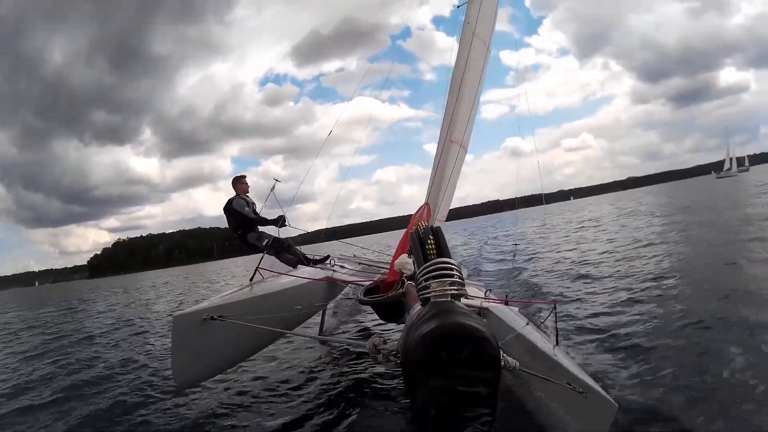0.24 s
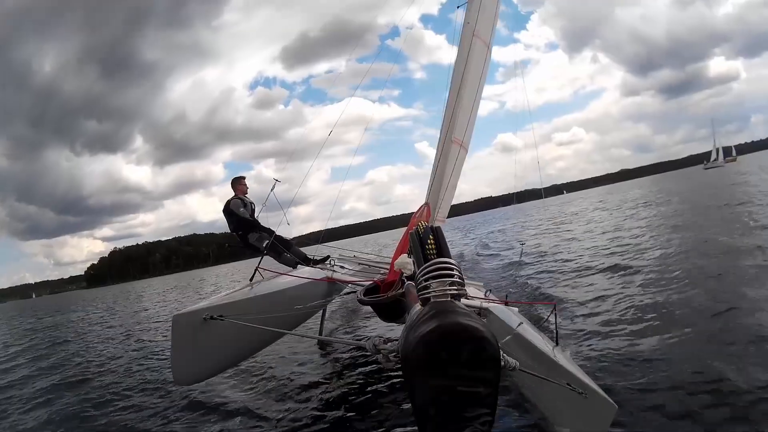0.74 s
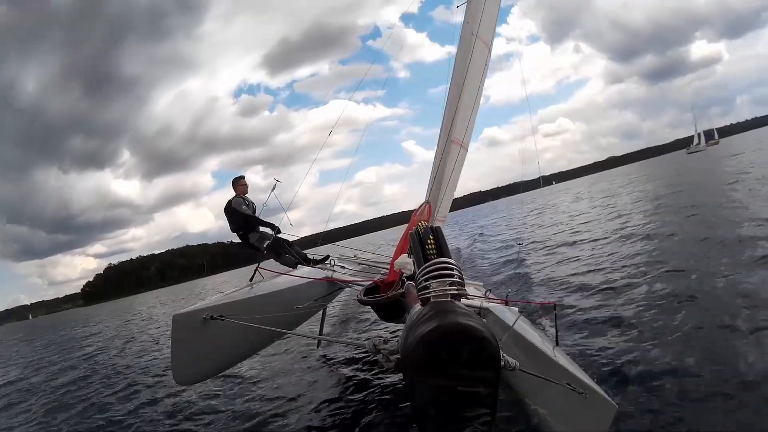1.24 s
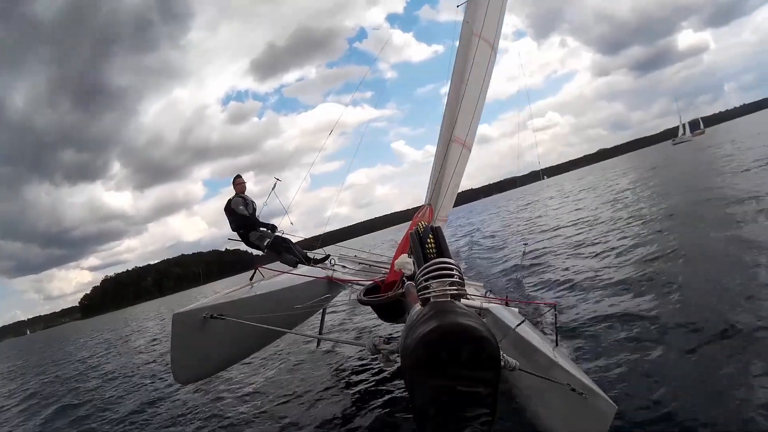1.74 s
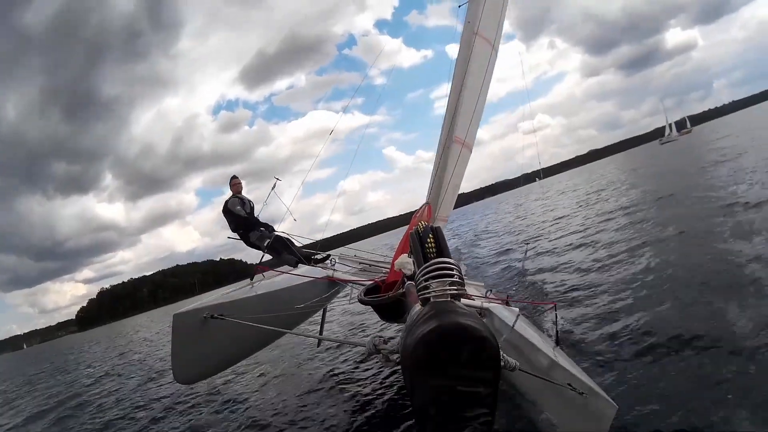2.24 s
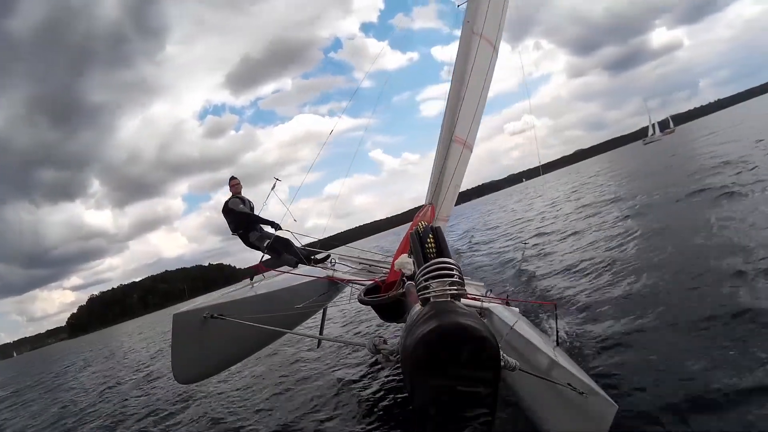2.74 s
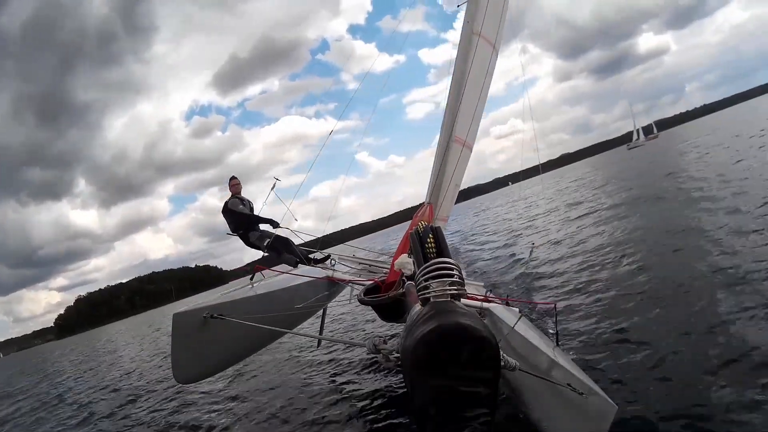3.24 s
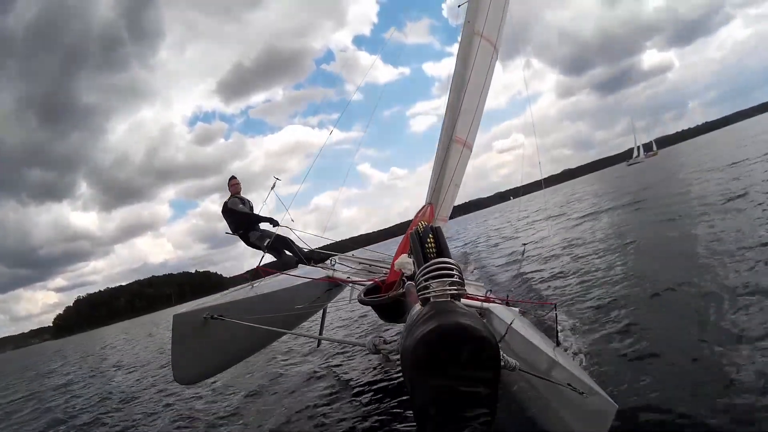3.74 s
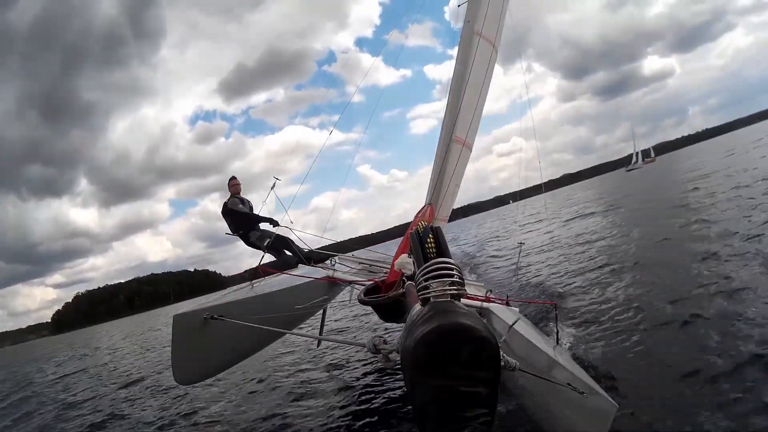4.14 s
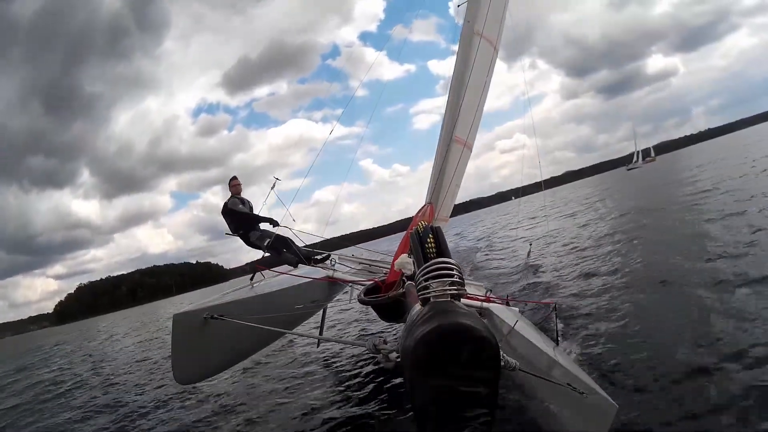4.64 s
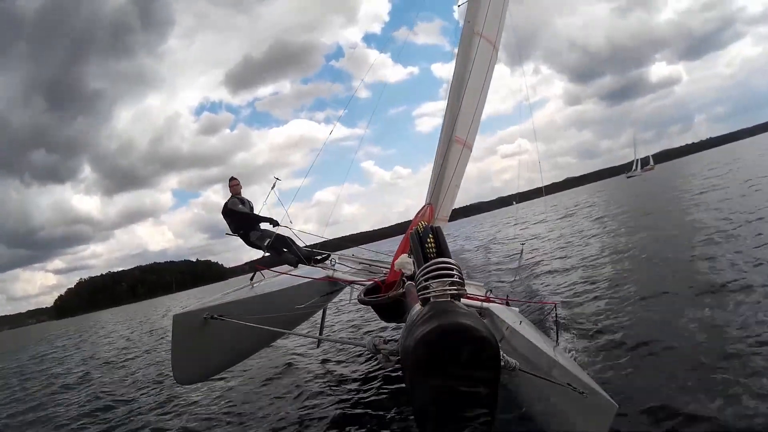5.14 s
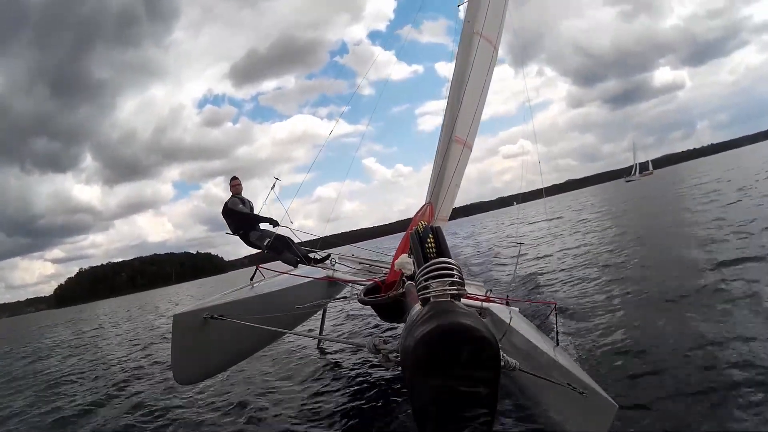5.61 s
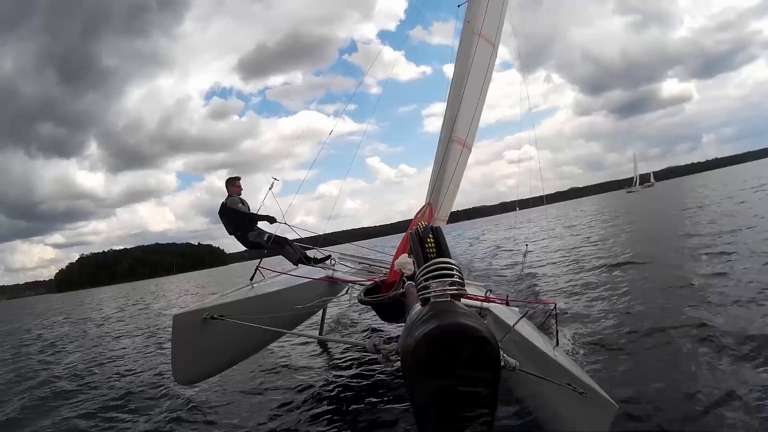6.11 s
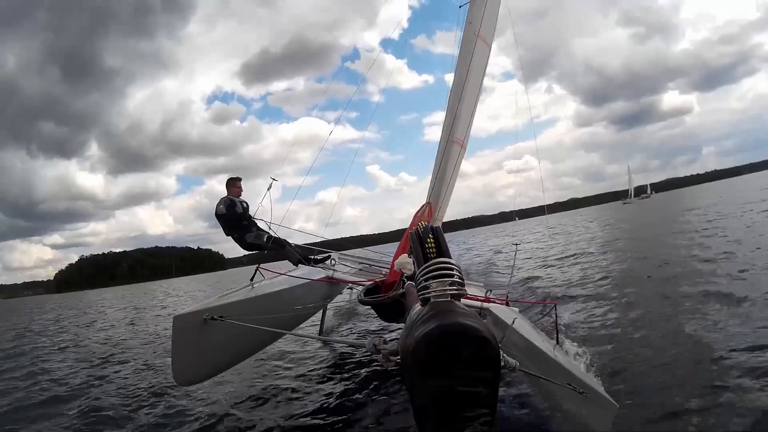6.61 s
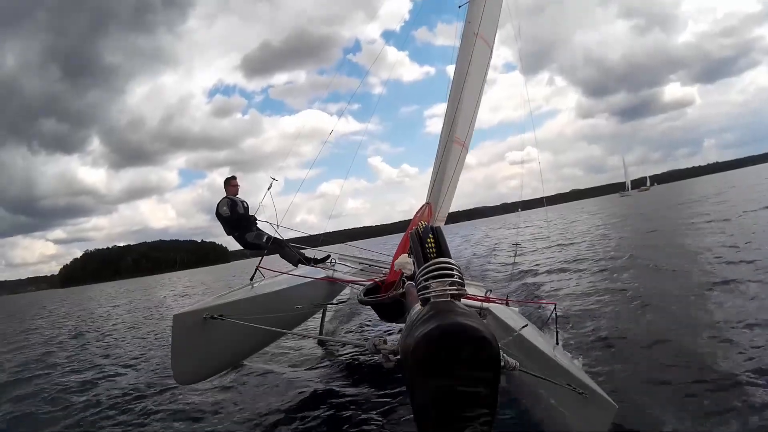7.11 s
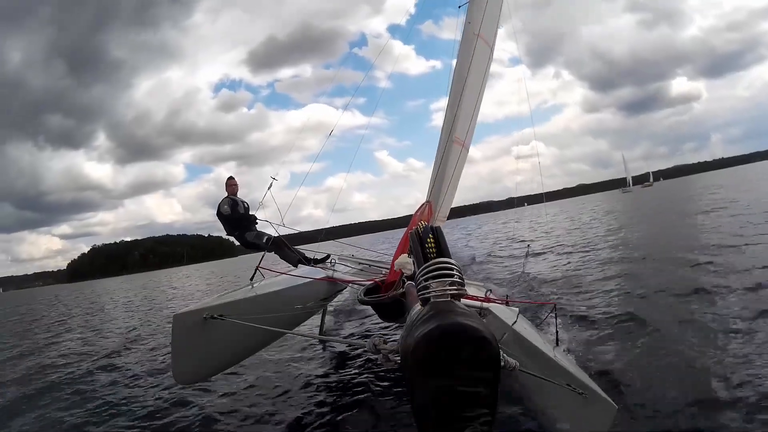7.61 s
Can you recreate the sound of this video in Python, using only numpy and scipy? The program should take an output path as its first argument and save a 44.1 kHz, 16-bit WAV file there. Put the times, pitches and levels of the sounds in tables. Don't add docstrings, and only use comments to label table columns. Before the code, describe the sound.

On open water, a sailing catamaran moves along with steady muffled wash and small waves lapping its hulls. The sheet block clicks, waves knock and rattle the hull, and the pole throbs deep below. Activity is busiest in the first two seconds, quiet in the middle, and rises again briefly after six. The close, boxy contact-like pickup has little treble and a silent right channel.

```python
import sys
import numpy as np
from scipy import signal
from scipy.fft import rfft, irfft
from scipy.io import wavfile
from scipy.ndimage import uniform_filter1d

SR = 44100
rng = np.random.default_rng(int(sys.argv[2]) if len(sys.argv) > 2 else 0)


def linear_from_db(decibels):
    return 10 ** (np.asarray(decibels, float) / 20)


def persist_wave(psi):
    counts = np.round(np.clip(psi, -1, 1) * 32767).astype(np.int16)
    wavfile.write(sys.argv[1], SR, np.atleast_2d(counts).T)


N = 346626

# mode_hz, t60_s, wash_db, knock_db
BOOM = [(107.8, 0.14, -11, -12.5), (182.5, 0.055, -23.5, -13), (232, 0.047, -9, -26), (279, 0.054, -14, -9),
        (358, 0.11, 0.5, -3.5), (385, 0.13, -2.5, -6), (444.7, 0.034, -10, -5)]
BODY = [(559.8, 0.036, 0, -3), (609, 0.015, -7.5, -4.5), (717.5, 0.079, -3.5, 0), (826, 0.024, -11, -1)]
# mode_hz, t60_s, wash_db, knock_db, ratchet_db
BUZZ = [(870, 0.026, -10.5, -6.5, -9), (1025, 0.044, -1, -1.5, -1.5), (1101, 0.019, -2.5, -3.5, -1.5),
        (1258, 0.033, -4.5, 2, 1), (1402, 0.032, 5, 1.5, -5), (1446, 0.025, -3.5, 4, 5.5),
        (1610, 0.022, -26, -16, -10), (1692, 0.016, -6.5, -9.5, -3.5)]
TICK = [(2129, 0.025, 8.5, 9.5, -19), (2328, 0.03, 4.5, 6, 3), (2590, 0.042, -7, -12, -13),
        (3063, 0.023, -1.5, -1, -2.5), (3240, 0.008, -11, -27, 3), (3510, 0.015, -17, -8, -2.5),
        (3550, 0.017, -14, -8, -20), (3950, 0.023, -4, -2.5, -16), (4590, 0.012, -20, -19, -12)]
WINDOW_HZ = 3830
STRUCTURE_GAIN_DB = 6.5


def level(x, rms_db):
    return x * linear_from_db(rms_db) / np.sqrt(np.mean(x ** 2))


def walk(rate_hz):
    hold = int(SR / rate_hz)
    steps = np.repeat(rng.standard_normal(N // hold + 1), hold)
    return 1.45 * uniform_filter1d(uniform_filter1d(steps, hold), hold)[:N]


def curve(table):
    time_s, *columns = np.transpose(table)
    return [np.interp(np.arange(N) / SR, time_s, column) for column in columns]


def ring(push, mode_hz, t60_s):
    r = np.exp(-np.log(1000) / (t60_s * SR))
    poles = [1, -2 * r * np.cos(2 * np.pi * mode_hz / SR), r * r]
    return np.sqrt(1 - r * r) * signal.lfilter([1, 0, -1], poles, push)


def case(x, cutoff_hz=1705):
    return signal.sosfilt(signal.cheby1(6, 1, cutoff_hz, fs=SR, output="sos"), x)


def wash(modes, push, flicker_db):
    total = np.zeros(N)
    for mode_hz, t60_s, wash_db, *_ in modes:
        mode = ring(push * rng.standard_normal(N), mode_hz, t60_s)
        total += linear_from_db(wash_db + flicker_db * walk(14)) * mode
    return level(total, 0)


def laps():
    lap_table = [(0.032, 6, .05), (0.875, 2, .06), (1.29, 2.5, .03), (2.04, 5, 0.059), (2.41, 3.5, 0.047),
                 (2.848, 0.5, .04), (2.959, 7, 0.064), (3.467, 5.5, .03), (3.6, 3, 0.066),
                 (3.995, 3.5, 0.038), (4.3, 4, .04), (4.538, 3.5, 0.076), (5.092, 3, 0.045),
                 (5.49, 3, 0.083), (5.719, 1.5, 0.09), (6.316, 6, 0.048), (6.52, 3, 0.033),
                 (6.93, 3.5, 0.089), (7.206, 1, .05), (7.634, 1, 0.026)]
    crest_s, lift_db, half_s = np.transpose(lap_table)[:, :, None]
    t = np.arange(0, N + 64, 64) / SR
    humps_db = lift_db * np.exp(-((t - crest_s) / half_s) ** 2)
    return np.sum(humps_db, axis=0).repeat(64)[:N]


def water():
    # time_s, flow_db, froth_db (shifts the weight from boom to buzz)
    flow = [(0.0, -53, -0.5), (0.61, -53, 0), (1.22, -52, 1.5), (1.47, -48.5, 2.5), (1.55, -50.5, -3.5),
            (1.86, -52.5, 2), (2.47, -55.5, 0), (2.8, -53.5, 1), (3.26, -56.5, 0.5), (3.57, -54.5, -1.5),
            (4.49, -54, -0.5), (4.84, -56, 1), (6.22, -54, 0.5), (6.41, -47.5, -6.5), (6.61, -51.5, 1.5),
            (7.03, -50, 0), (7.51, -55, 2), (7.86, -54.5, -1.5)]
    flow_db, froth_db = curve(flow)
    flow_db = flow_db + laps() + 6
    boom_db = flow_db - 1 - 0.5 * froth_db
    body_db = flow_db - 4 + 0.1 * froth_db
    buzz_db = flow_db - 6.5 + 0.5 * froth_db
    spray_db = buzz_db - 22
    puffs_db = 1.01 * walk(22) + 2.02 * walk(70)
    low = linear_from_db(boom_db) * wash(BOOM, linear_from_db(0.44 * puffs_db), flicker_db=1.5)
    low += linear_from_db(body_db) * wash(BODY, linear_from_db(1.04 * puffs_db), flicker_db=2.5)
    low += linear_from_db(buzz_db) * wash(BUZZ, linear_from_db(0.74 * puffs_db), flicker_db=1.5)
    spray = linear_from_db(spray_db) * wash(TICK, linear_from_db(0.8 * puffs_db), flicker_db=1.5)
    return case(low) + spray


def hiss():
    # freq_hz, level_db
    colour = [(100, 7), (2000, 6), (4000, 0.5), (8000, -1), (16000, -3)]
    freq_hz, colour_db = np.transpose(colour)
    bin_hz = np.arange(N // 2 + 1) * SR / N
    gain_db = np.interp(np.log(bin_hz + 1), np.log(freq_hz), colour_db)
    return level(irfft(rfft(rng.standard_normal(N)) * linear_from_db(gain_db), N), -67.5)


def jolts():
    jolt_table = [(0.01, -45, 0.041), (0.24, -57.5, 0.38), (0.61, -54, 0.087), (0.88, -53, 0.22),
                  (1.01, -50.5, 0.19), (1.38, -39, 0.053), (1.53, -42, .08), (1.6, -42, 0.039),
                  (1.71, -41.5, 0.096), (1.95, -52, 0.35), (2.2, -59, .06), (2.32, -58, 0.062),
                  (2.56, -54.5, 0.074), (3.06, -52.5, 0.092), (3.37, -53, 0.069), (3.59, -61, .2),
                  (3.74, -50.5, 0.087), (4.07, -65, 0.093), (4.29, -57, .2), (4.53, -57, .15),
                  (4.88, -55, 0.27), (5.71, -55, 0.039), (5.82, -54.5, .2), (6.17, -52.5, .04),
                  (6.3, -44.5, 0.11), (6.52, -51.5, 0.049), (6.92, -49, 0.13), (7.29, -53, 0.046),
                  (7.45, -56, 0.21), (7.84, -51, .03)]
    idle_db, flicker_db, rise_s = -61, -1, 0.045
    t = np.arange(N) / SR
    power = linear_from_db(idle_db + flicker_db * walk(6)) ** 2
    for start_s, level_db, ring_s in jolt_table:
        age = t - start_s
        shape = np.where(age < 0, -(age / rise_s) ** 2, -age / ring_s)
        power = power + (linear_from_db(level_db) * np.exp(shape)) ** 2
    return 10 * np.log10(power)


def pole():
    # time_s, pitch_hz
    stays = [(0, 59.3), (.45, 55.55), (.65, 49.2), (1.38, 51.2), (1.58, 61.8), (1.78, 57.05), (2.3, 62.96),
             (2.6, 47), (2.93, 56.4), (3.1, 46.45), (3.42, 55.36), (3.7, 44.3), (4.15, 60.1), (4.75, 58.25),
             (4.98, 44), (6.4, 53), (7.1, 56.94), (7.75, 45)]
    # mode_hz, t60_s, wash_db, unused
    hum = [(41, 0.29, 0, 0), (73.1, 0.36, -2, 0), (109.5, 0.03, -12, 0), (154, 0.12, -9, 0)]
    (pitch_hz,), swing_db = curve(stays), jolts()
    upright_hz = pitch_hz * (1 + 0.0811 * walk(18))
    sideways_hz = 1.1 * pitch_hz * (1 + 0.1057 * walk(20))
    swing = np.sin(2 * np.pi * np.cumsum(upright_hz) / SR)
    swing += 0.46 * np.sin(2 * np.pi * np.cumsum(sideways_hz) / SR)
    rumble_db = uniform_filter1d(swing_db, SR // 5) - 3.5
    rumble = linear_from_db(rumble_db) * wash(hum, 1.0, flicker_db=2.5)
    return linear_from_db(STRUCTURE_GAIN_DB) * (linear_from_db(swing_db + 1.5) * swing + rumble)


def blows(table, share_column, rise_s):
    size = SR // 8
    t, out = np.arange(size) / SR, np.zeros(N + size)
    for start_s, peak_db, boom_db, body_db, tick_db, contact_s in table:
        blow = np.zeros(size)
        groups = ((BUZZ, 0, 1), (BOOM, boom_db, 1), (BODY, body_db, 1), (TICK, tick_db, 0.7))
        for modes, group_db, quickness in groups:
            fade = np.exp(-t / (quickness * contact_s)) * (1 + 2.4 * np.exp(-t / 0.0013))
            push = fade * (1 - np.exp(-t / rise_s))
            rings = []
            for mode in modes:
                sound = ring(push * rng.standard_normal(size), mode[0], mode[1])
                rings.append(linear_from_db(mode[share_column]) * sound / np.abs(sound).max())
            if modes is TICK:
                group = case(sum(rings[:-1]), WINDOW_HZ) + rings[-1]
            else:
                group = case(sum(rings))
            blow += linear_from_db(group_db) * group / np.abs(group).max()
        start = int(start_s * SR)
        out[start:start + size] += linear_from_db(peak_db + STRUCTURE_GAIN_DB) * blow
    return out[:N]


def knocks():
    # start_s, peak_db (near 1.3 kHz), hull_db, tick_db, contact_s
    slap_table = [(0.0139, -25.5, -3, -14, 0.011), (1.194, -29, 1.5, -12, 0.011),
                  (1.3474, -30, -1, -14.5, 0.0063), (1.371, -28, -1, -28, 0.007),
                  (1.3855, -29.5, 0.5, -12, 0.0021), (1.408, -31, 0.5, -29, 0.022),
                  (1.502, -35.5, 3, -24, 0.003), (1.629, -28, -3, -19, 0.004),
                  (1.675, -33.5, 6.5, -13, 0.0085), (1.8313, -28, 0.5, -15.5, 0.0027),
                  (1.9584, -42.5, 2, -17, 0.006), (2.114, -35.5, -4.5, -19, 0.0075),
                  (2.955, -48, 7, -24, 0.0091), (3.551, -40.5, -3, -22, 0.01),
                  (6.3857, -26, 0, -13.5, 0.007), (6.459, -27, 3, -10.5, 0.0081),
                  (6.977, -43.5, -1, -20, 0.012)]
    # start_s, peak_db, hull_db, tick_db
    click_table = [(0.2187, -32.5, -7, -14.5), (0.3421, -29.5, -11, -15), (0.4592, -35.5, -11.5, -13.5),
                   (0.5836, -35.5, -9, -20), (1.4576, -29.5, -15.5, -11), (1.5502, -31.5, -6.5, -25),
                   (1.5868, -25, -16, -18.5), (1.7733, -30.5, -14, -20), (1.9238, -29.5, -15, -16),
                   (2.2645, -42.5, -7, -19), (3.9347, -44.5, -26, -11.5), (5.8667, -40.5, -8, -19),
                   (5.9881, -41, -7.5, -14)]
    # start_s, peak_db, hull_db, tick_db
    splash_table = [(0.41, -52.5, -3, -26), (0.7519, -46, -14, -29), (1.298, -48.5, 7.5, -26),
                    (1.3342, -42.5, 3, -27), (1.4186, -35.5, -1, -19), (1.4344, -39, 1, -21),
                    (1.4409, -37, -3.5, -27), (1.4776, -43, -17, -11.5), (1.5436, -37, -11, -17),
                    (1.6159, -43.5, 6, -26), (1.6414, -43, 3, -22), (1.6642, -34, -13, -18),
                    (1.6826, -41, 0.5, -15), (1.6903, -56.5, 3, -9), (2.0953, -44.5, -6, -20),
                    (2.1337, -49.5, 0, -13), (2.2902, -43.5, -13, -24), (3.438, -46, -2, -26),
                    (3.5753, -43.5, -11, -26), (3.5941, -43, -3.5, -31), (3.6291, -48, -3, -28),
                    (3.8533, -47.5, -22, -29), (3.9782, -48, 0, -33), (4.473, -41.5, -10, -27),
                    (5.7461, -45, -21, -31), (6.2041, -51, 6, -32), (6.314, -41, -4.5, -25),
                    (6.3349, -41.5, -5, -33), (6.827, -44.5, -2, -26), (6.8918, -47.5, 3, -31)]
    slaps = [(s, peak, hull - 2.5, hull, tick, contact) for s, peak, hull, tick, contact in slap_table]
    clicks = [(s, peak, hull, hull, tick, 0.0068) for s, peak, hull, tick in click_table]
    splashes = [(s, peak, hull + 2, hull, tick, 0.015) for s, peak, hull, tick in splash_table]
    knock_column, ratchet_column = 3, -1
    out = blows(slaps, knock_column, rise_s=0.00025)
    out += blows(clicks, ratchet_column, rise_s=0.00021)
    return out + blows(splashes, knock_column, rise_s=0.003)


def bloops():
    # start_s, peak_db, pitch_hz, swell_s
    bloop_table = [(0.029, -39.5, 371, 0.021), (0.308, -37, 371, 0.012), (0.846, -34.5, 386, 0.0044),
                   (0.05, -44, 555, 0.04), (1.309, -28, 372, 0.0041), (1.508, -30, 382, 0.004),
                   (2.078, -31.5, 366, 0.019), (2.291, -40, 373, 0.0051), (2.388, -41.5, 671, 0.0067),
                   (2.796, -35.5, 370, 0.0057), (2.939, -37.5, 384.5, 0.013), (2.956, -43, 365, 0.015),
                   (3.001, -40.5, 346, 0.01), (3.435, -43, 382, 0.0082), (3.593, -41.5, 626, 0.021),
                   (3.632, -40, 380, 0.0082), (4.489, -28.5, 365, 0.0089), (4.515, -34.5, 377.4, 0.016),
                   (4.573, -39, 728, 0.0085), (5.735, -40, 358, 0.016), (6.217, -33.5, 367, 0.0074),
                   (6.326, -29, 374.6, 0.011), (6.49, -30.5, 359.3, 0.018), (6.538, -35, 373.6, 0.011),
                   (6.624, -41, 380, 0.0075), (6.844, -36.5, 352, 0.011), (6.899, -40, 385, 0.021),
                   (6.96, -32, 575, 0.0058), (7.064, -37.5, 387, 0.0099), (7.1, -33.5, 372, 0.013)]
    size = SR // 5
    t, out = np.arange(size) / SR, np.zeros(N + size)
    for start_s, peak_db, pitch_hz, swell_s in bloop_table:
        age = t / swell_s
        tone = np.sin(2 * np.pi * (pitch_hz * t + rng.random()))
        start = int(start_s * SR)
        out[start:start + size] += linear_from_db(peak_db) * age * np.exp(1 - age) * tone
    return out[:N]


def crackles():
    # start_s, peak_db
    crackle_table = [
        (1.203, -58),
        (1.5514, -63),
        (1.835, -61),
        (3.9357, -67),
    ]
    start_s, peak_db = np.transpose(crackle_table)
    out = np.zeros(N)
    out[(start_s * SR + 30).astype(int)] = linear_from_db(peak_db + 22.5)
    return out


def slips():
    # start_s, length_s, level_db
    slip_table = [
        (1.409, 0.034, -66.5),
        (1.676, 0.026, -64.5),
        (1.634, .014, -68),
    ]
    t, grip = np.arange(N) / SR, np.zeros(N)
    for start_s, length_s, level_db in slip_table:
        edge_s = np.minimum(t - start_s, start_s + length_s - t)
        grip += linear_from_db(level_db) * np.clip(edge_s / 0.002, 0, 1)
    push = grip * linear_from_db(2.1 * walk(250))
    rasp = np.zeros(N)
    for mode_hz, t60_s, _, knock_db, _ in TICK[:-1]:
        rasp += linear_from_db(0.89 * knock_db) * ring(push * rng.standard_normal(N), mode_hz, 0.77 * t60_s)
    return case(rasp, 1.04 * WINDOW_HZ)


def scene():
    left = water() + pole() + knocks() + bloops() + slips()
    return np.array([case(left, cutoff_hz=4810), np.zeros(N)])


def low_pass(x):
    return signal.sosfilt(signal.butter(12, 16630, fs=SR, output="sos"), x)


def record(dry):
    clock_hz, mirror_db, top_hz = 16005, -12, 15760
    slope = np.diff(dry, prepend=0)
    mirror = linear_from_db(mirror_db) * 2 * slope * np.cos(2 * np.pi * clock_hz * np.arange(N) / SR)
    left_only = np.array([[1], [0]])
    wet = dry + mirror + (hiss() + crackles()) * left_only
    wet = signal.sosfilt(signal.ellip(10, 0.2, 60, top_hz, fs=SR, output="sos"), wet)
    return low_pass(wet)


dry = scene()
out = record(dry)
persist_wave(out)
```